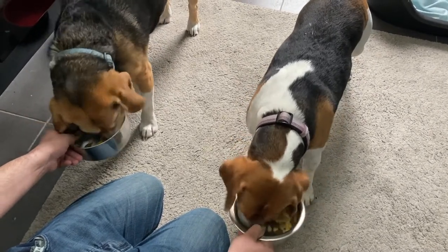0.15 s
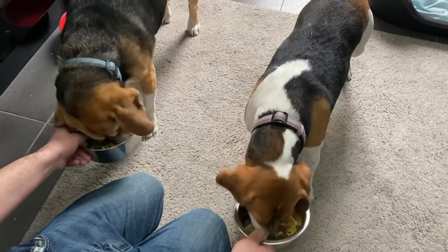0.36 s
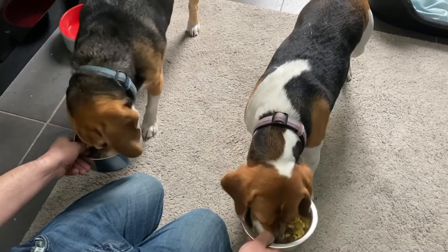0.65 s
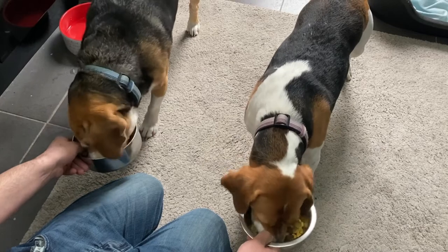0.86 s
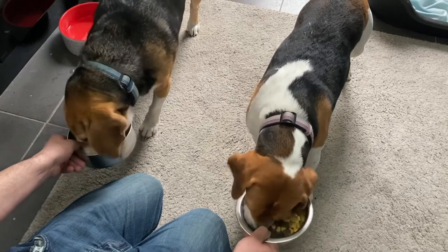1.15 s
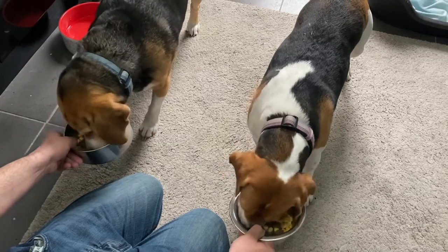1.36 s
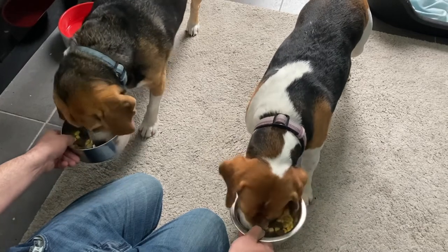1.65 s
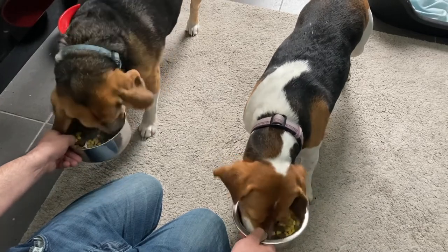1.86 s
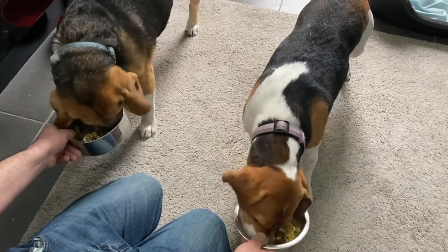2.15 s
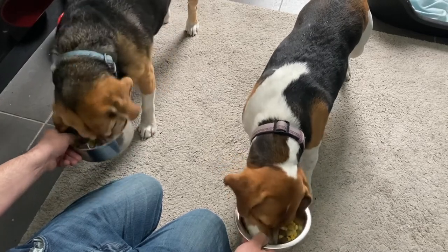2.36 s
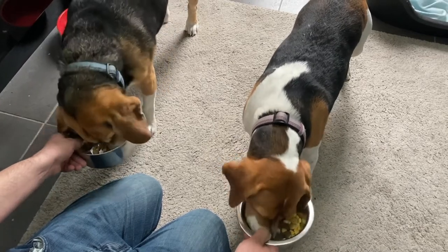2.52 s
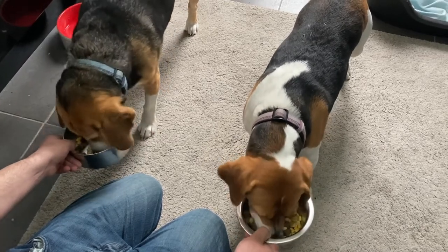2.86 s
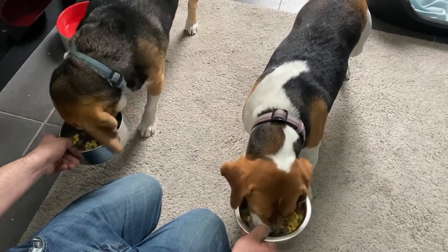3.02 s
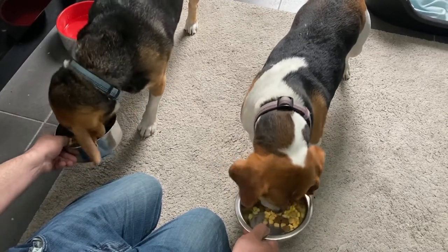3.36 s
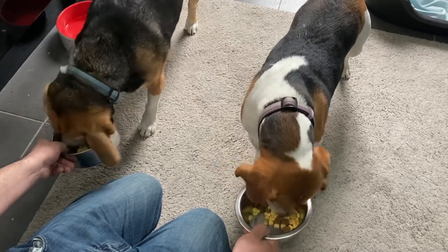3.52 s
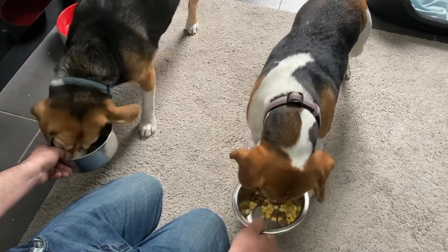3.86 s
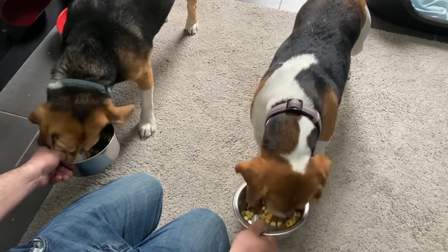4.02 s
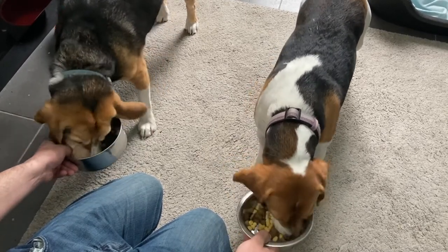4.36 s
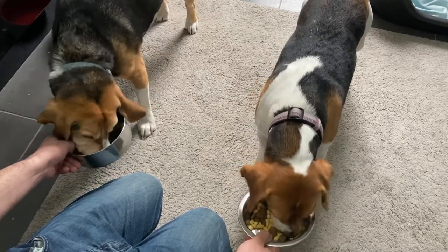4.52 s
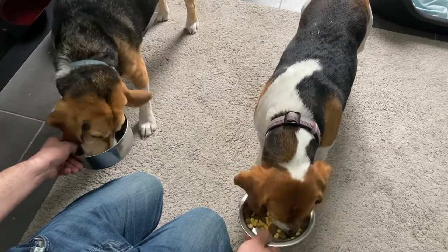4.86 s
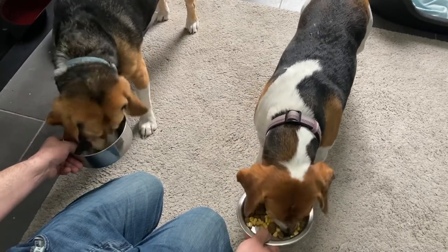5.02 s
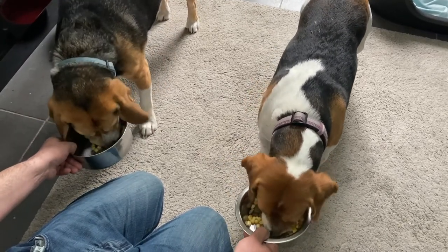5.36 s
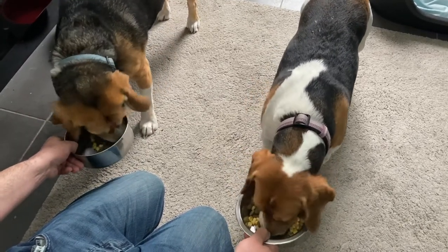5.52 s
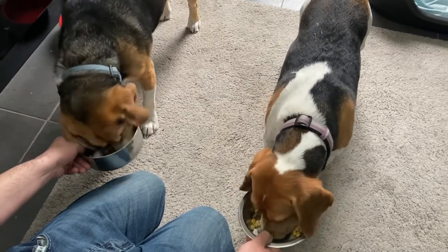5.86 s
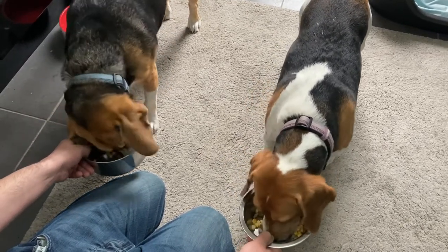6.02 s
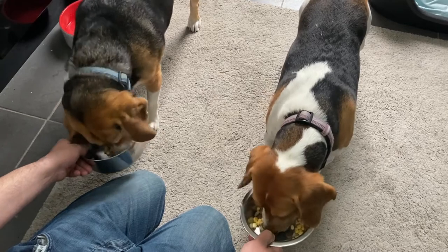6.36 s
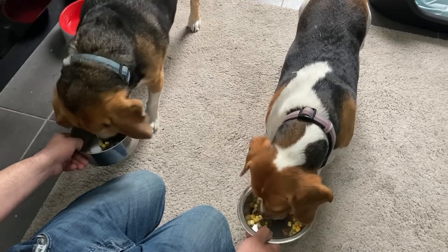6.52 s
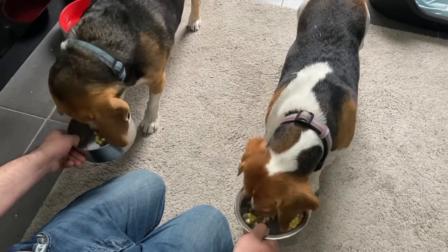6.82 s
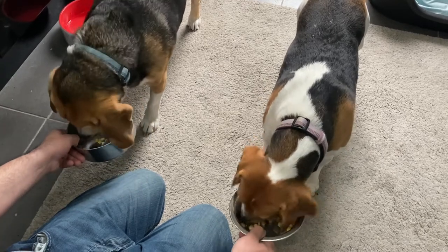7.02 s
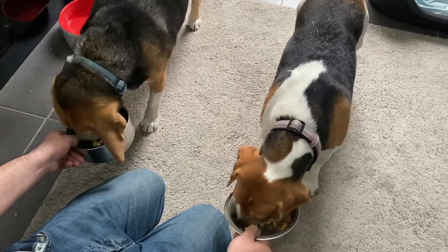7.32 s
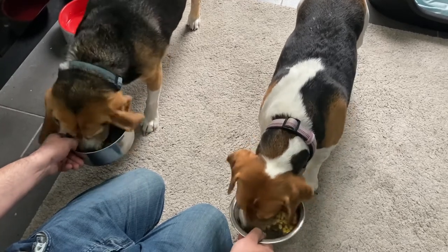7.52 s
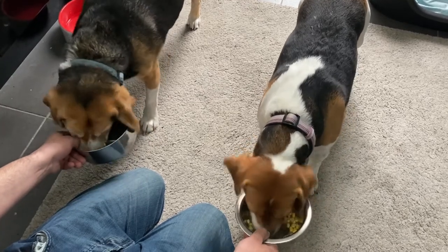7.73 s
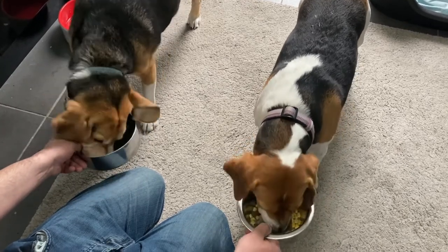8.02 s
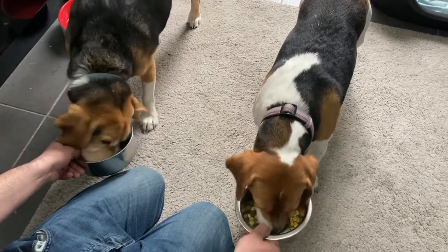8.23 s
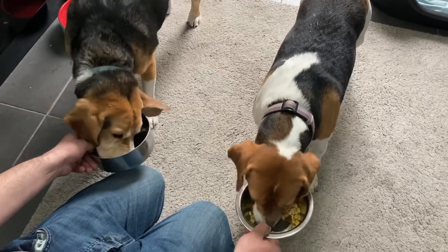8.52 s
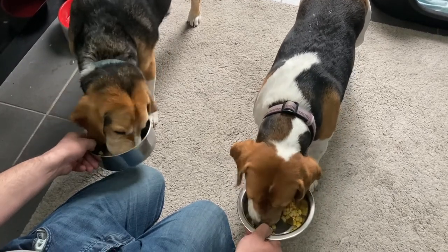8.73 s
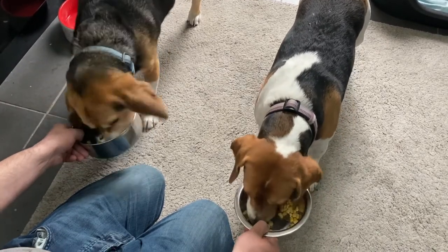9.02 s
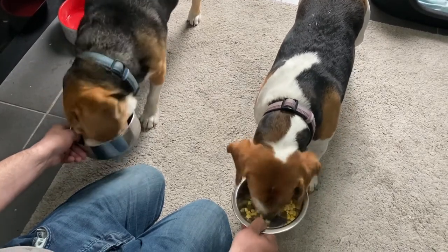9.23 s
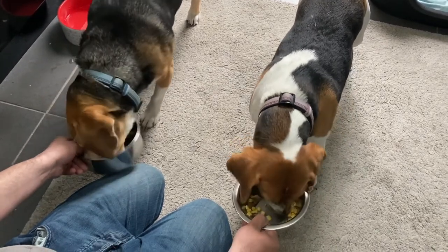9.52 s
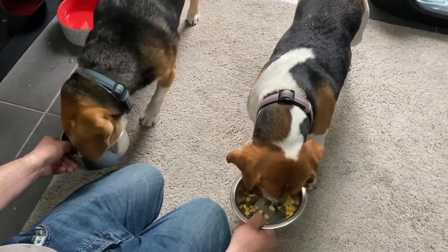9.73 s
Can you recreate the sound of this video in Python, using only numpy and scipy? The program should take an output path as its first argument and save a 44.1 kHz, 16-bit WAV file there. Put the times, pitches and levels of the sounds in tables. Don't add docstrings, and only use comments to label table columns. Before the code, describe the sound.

Close, busy dog eating indoors: grainy scraping and soft hollow laps in two metal bowls, hard kibble clinks and brief collar-tag jingles.

```python
import sys
import numpy as np
from scipy import signal
from scipy.fft import rfft, irfft, next_fast_len
from scipy.io import wavfile
from scipy.ndimage import uniform_filter1d, map_coordinates

SR = 44100
rng = np.random.default_rng(int(sys.argv[2]) if len(sys.argv) > 2 else 0)


def transcribe(signal):
    frames = np.atleast_2d(signal).T
    limited = np.clip(frames, -1, 1)
    pcm = np.round(limited * 32767).astype(np.int16)
    wavfile.write(sys.argv[1], SR, pcm)


def linear_from_db(decibels):
    return 10 ** (np.asarray(decibels, float) / 20)


N = 435708

# pitch_hz, width_hz, level_db
TAGS = [(5360, 330, 2), (5880, 63, 4.5), (5040, 78, -3.5), (7430, 100, 5), (8200, 73, 5.5), (9130, 140, 3),
        (9700, 1300, -14.5), (10960, 99, 5), (12300, 130, -22)]
# pitch_hz, width_hz, level_db
HOLLOW = [(453.5, 63, -10.5), (531, 56, -7.5), (662.5, 59, 1.5), (720.6, 43, 3.5), (813, 120, -6.5)]
# pitch_hz, width_hz, level_db
WALL = [(1030, 21, -2), (1420, 31, 5), (1650, 10.6, 0.5), (1983, 7, -3), (2660, 35, 0), (3730, 43, 4),
        (4390, 136, -28)]
# frequency_hz, likeness (0 to 1)
FLOOR_ALIKE = [(60, .88), (290, .85), (700, .65), (1500, .1)]
# start_s, peak_db, pitch_hz, drag_s (the tongue dragging on after)
LEFT_THUDS = [(0.134, -19.5, 733, 0.17), (0.445, -29, 680, 0.1), (0.771, -31.5, 660, 0.062),
              (0.833, -26.5, 600, 0.034), (1.051, -23, 686, 0.17), (1.747, -31.5, 675, 0.24),
              (2.089, -28, 730, 0.15), (2.287, -25, 686, 0.24), (2.426, -22, 567, 0.4),
              (2.759, -30.5, 675, 0.28), (2.918, -17.5, 695, 0.24), (2.961, -15, 740, 0.056),
              (3.337, -28.5, 693, 0.085), (3.517, -33, 635, 0.3), (3.943, -21.5, 582, 0.049),
              (4.146, -21, 720, 0.25), (4.357, -19, 760, 0.36), (4.435, -23.5, 755, 0.23),
              (4.694, -28, 660, 0.38), (4.857, -17.5, 700, 0.028), (5.103, -27, 770, 0.38),
              (5.231, -29, 710, 0.027), (5.527, -23.5, 710, 0.14), (5.824, -27, 700, 0.14),
              (6.31, -27.5, 600, 0.1), (6.542, -25.5, 670, 0.093), (7.058, -18.5, 722, 0.033),
              (9.176, -19.5, 606, 0.051), (9.513, -33.5, 714, 0.15)]
RIGHT_THUDS = [
    (1.552, -25.5, 815, 0.11),
    (4.921, -27.5, 636, 0.66),
    (5.728, -29, 686, 0.07),
    (5.968, -31.5, 540, 0.025),
    (7.476, -32.5, 638, .1),
    (8.61, -22, 594, 0.12),
    (8.879, -20, 623, 0.076),
    (9.102, -27.5, 580, 0.27),
]


def unit(x):
    return x / np.sqrt(np.mean(x ** 2) + 1e-20)


def along(points, hz):
    f, v = np.transpose(points)
    return np.interp(np.log(hz + 1), np.log(f + 1), v)


def wobble(rate):
    knots = rng.standard_normal(int(N * rate / SR) + 4)
    return map_coordinates(knots, [np.arange(N) * rate / SR])


def filtered(x, response):
    m = next_fast_len(x.shape[-1] + 8192)
    spectrum = rfft(x, m) * response(np.fft.rfftfreq(m, 1 / SR))
    return irfft(spectrum, m)[..., :x.shape[-1]]


def resonances(modes):
    return lambda f: sum((-1) ** k * linear_from_db(db) * 1j * f * w / (c * c - f * f + 1j * f * w)
                         for k, (c, w, db) in enumerate(modes))


def diffuse(f):
    turn = np.arccos(along(FLOOR_ALIKE, f)) / 2
    return np.array([np.cos(turn), np.sin(turn)])


def by_bowl(left, right):
    return [(bowl, *row) for bowl, rows in enumerate([left, right]) for row in rows]


def strike(bowls, s, bowl, sound):
    return bowls[bowl, round(s * SR):][:len(sound)]


def background():
    # frequency_hz, level_db (per Hz)
    air_colour = [(30, -17), (86, -17.5), (266, -5.5), (473, -9.5), (900, -13.5), (1430, -15.5),
                  (3500, -30), (7000, -41), (12000, -49), (16000, -49)]
    # pitch_hz, level_db (rms), phase_rad
    hums = [(98.76, -67.1, .4), (99.823, -69.9, 1.45), (200.99, -75, 0), (246.89, -72, 0), (296.26, -73, 0)]
    whistle = resonances([(2950, 70, 6)])
    air = linear_from_db(1.9 * np.sin(np.arange(N) / 8900.0)) * rng.standard_normal((2, N))
    mid, side = filtered(air, lambda f: linear_from_db(along(air_colour, f)) * abs(1 + whistle(f)) * diffuse(f))
    t = np.arange(N) / SR
    hum = sum(linear_from_db(db + 6.5) * np.cos(2 * np.pi * hz * t + phase) for hz, db, phase in hums)
    return linear_from_db(-56.5 + 0.13 * wobble(0.62)) * unit(np.array([mid + side, mid - side])) + hum


def grains(per_s, spread_db, hiss):
    hit = rng.random(N) < per_s / SR * linear_from_db(np.minimum(5 * wobble(40), 5))
    force = linear_from_db(spread_db * np.minimum(rng.standard_normal(N), 1.6))
    size = signal.lfilter([1], [1, -np.exp(-1 / (0.00047 * SR))], hit * force)
    return unit((unit(size) + hiss) * rng.standard_normal(N))


def pings(per_s, centre_hz, cycles):
    draw = rng.standard_normal((int(per_s * N / SR), 2))
    hz = np.clip(centre_hz * np.exp(0.537 * draw[:, :1]), 900, 14000)
    t = np.arange(256) / SR
    force = linear_from_db(5 * np.minimum(draw[:, 1:], 1.5))
    wave = force * np.exp(-t * hz / cycles) * np.sin(2 * np.pi * hz * t)
    at = rng.integers(N, size=(len(hz), 1)) + np.arange(len(t))
    return unit(np.bincount(at.ravel(), wave.ravel(), N)[:N])


def patchy(x, depth_db):
    z = signal.stft(x, nperseg=256)[2]
    field = uniform_filter1d(uniform_filter1d(rng.standard_normal(z.shape), 4, 0), 9, 1)
    return signal.istft(z * linear_from_db(depth_db * unit(field)), nperseg=256)[1][:N]


def stroke_gain(rows, swing_db):
    s, db, rise, fall = np.transpose(rows)[:, :, None]
    t = np.arange(0, N, 16) / SR
    gain = linear_from_db(db - swing_db * np.maximum((s - t) / rise, (t - s) / fall))
    return np.interp(np.arange(N) / SR, t, np.sqrt(np.sum(gain ** 2, axis=0)))


def efforts():
    # peak_s, scrape_db, rise_s, fall_s, dry_db (dry shuffle over scrape)
    tongue_sweeps = [(0.1, -30, 0.068, 0.39, -4.5), (0.349, -31, 0.18, 0.29, 1.5),
                     (0.559, -48, 0.53, 0.12, 15), (0.872, -40, 0.14, 0.14, 2), (1.018, -53.5, 0.019, 0.1, 13),
                     (1.14, -30, 0.11, 0.11, -11.5), (1.29, -44.5, 0.025, 0.83, 3.5),
                     (1.57, -33.5, 0.055, 0.12, 0.5), (1.8, -40, 0.11, 0.16, 1),
                     (2.16, -37.5, 0.055, 0.12, -9), (2.325, -49, 0.025, 0.19, 7.5),
                     (2.49, -34.5, 0.053, 0.24, 0), (2.704, -60, 0.061, 0.19, 16.5),
                     (2.764, -25.5, 0.019, 0.16, -18.5), (2.98, -36, 0.099, 0.079, -19),
                     (3.452, -40.5, 0.077, 0.3, -35), (3.59, -46.5, 0.17, 0.19, 5.5),
                     (3.822, -49.5, 0.037, 0.84, 10.5), (3.941, -35, 0.12, 0.56, -2.5),
                   (4.1, -37, 0.088, 0.94, 1.5), (4.36, -30.5, 0.016, 0.41, -8.5),
                   (4.583, -35.5, 0.029, 0.094, -1.5), (4.747, -49, 0.022, 0.046, 13.5),
                   (4.85, -35.5, 0.049, 0.22, 0), (5.103, -53.5, 0.033, 0.61, -6.5),
                   (5.4, -54.5, 0.071, 0.38, -1), (5.524, -27, 0.011, 0.062, -18.5),
                   (5.737, -34, 0.1, 0.05, -10), (5.987, -37, 0.32, 0.13, -9),
                   (6.146, -46.5, 0.014, 0.5, -2), (6.316, -50, 0.17, 0.096, 9.5),
                   (6.446, -28.5, 0.017, 0.077, -39), (6.725, -38.5, 0.054, 0.05, -24),
                     (6.863, -42, .03, 0.65, 2), (6.95, -32.5, 0.13, 0.62, -1.5), (7.256, -31, 0.21, 0.24, -4),
                  (7.493, -28, 0.075, 0.14, -4), (7.735, -33.5, 0.053, 0.094, -3.5),
                  (7.982, -54, 0.044, 0.3, 9.5), (8.042, -35.5, 0.18, 0.084, -12),
                  (8.221, -58, 0.049, 0.29, 14), (8.33, -40, 0.079, 0.04, -6),
                  (8.492, -44, 0.0084, 0.26, -7), (8.623, -39, 0.021, 0.12, -3.5),
                  (8.786, -62, 0.016, 0.16, 6), (9.047, -38.5, 0.011, 0.35, -14.5),
                  (9.19, -40.5, 0.19, 0.082, -1.5), (9.424, -68.5, 0.1, 0.08, 13),
                  (9.553, -45.5, 0.0094, 0.078, -2.5), (9.619, -50.5, 0.23, 0.021, -11),
                  (9.73, -70.5, 0.0077, 0.16, 13)]
    # peak_s, level_db, fall_s
    shoves = [(0.389, -35.5, 0.098), (0.646, -33, 0.079), (0.874, -37.5, 0.024), (1.337, -44, 0.29),
              (2.196, -38, 0.022), (4.15, -22.5, 0.068), (6.136, -38, 0.26), (6.728, -30.5, 0.038),
              (6.985, -34.5, 0.27), (7.273, -36, 0.2), (7.503, -37.5, 0.41), (8.349, -33.5, 0.0097)]
    shove_rise_s, thud_rise_s = 0.091, 0.017
    after_thud_db = -11.5
    swing_db, dry_swing_db = 31, 35.5
    rest_press_db, rest_scrape_db = -59.5, -62.5
    strokes = [(s + thud_rise_s / 2, db + after_thud_db, thud_rise_s, drag)
               for s, db, hz, drag in LEFT_THUDS + RIGHT_THUDS]
    strokes += [(s, db, shove_rise_s, fall) for s, db, fall in shoves]
    press = stroke_gain(strokes, swing_db)
    sweeps = tongue_sweeps
    scrape = stroke_gain([(s, db, rise, fall) for s, db, rise, fall, dry_db in sweeps], swing_db)
    shuffle = stroke_gain([(s, db + dry_db, rise, fall) for s, db, rise, fall, dry_db in sweeps], dry_swing_db)
    return press + linear_from_db(rest_press_db), scrape + linear_from_db(rest_scrape_db), shuffle


def pushing(boom_share_db, rasp_share_db):
    # frequency_hz, level_db (per Hz)
    rasp_colour = [(150, -76), (400, -7.5), (900, -5), (1650, -2), (3000, -9), (5000, -12.5), (8000, -47)]
    # frequency_hz, level_db (per Hz)
    rattle_colour = [(500, -59), (2000, -7), (3600, 2), (5000, -3), (7000, -3), (10500, 0.5), (13500, -7),
                     (15800, -14)]
    slide = patchy(grains(per_s=260, spread_db=1.5, hiss=0.9), depth_db=2.5)
    boom = unit(filtered(slide, resonances(HOLLOW)))
    food = patchy(grains(per_s=990, spread_db=3.5, hiss=0.05), depth_db=5.5)
    wall, tinkle = resonances(WALL), resonances(TAGS)
    rasp = food + 0.8 * pings(per_s=400, centre_hz=2024, cycles=8.8)
    rasp = unit(filtered(rasp, lambda f: linear_from_db(along(rasp_colour, f)) * (1 + 1.81 * wall(f))))
    rattle = food + 1.1 * pings(per_s=580, centre_hz=6404, cycles=12)
    rattle = unit(filtered(rattle, lambda f: linear_from_db(along(rattle_colour, f)) * (1 + tinkle(f))))
    press, scrape, shuffle = efforts()
    rough = scrape * rasp + shuffle * rattle
    boom_gain = linear_from_db(boom_share_db + 2.86 * wobble(30))
    rough_gain = linear_from_db(rasp_share_db + 0.55 * wobble(30))
    return boom_gain * press * boom + rough_gain * rough


def touches(left, right, rise_s, edge, tail):
    bowls, t = np.zeros((2, N + SR)), np.arange(SR // 20) / SR
    for bowl, s, db, hz in by_bowl(left, right):
        rise = rise_s * np.sqrt(1000 / hz)
        swell = (t / rise * np.exp(1 - t / rise)) ** 2
        ring = tail * (1 - np.exp(-t / rise)) ** 2 * linear_from_db(-60 * t / 0.069)
        click = edge * np.exp(-t * hz * 1.5) * np.sin(2 * np.pi * 1.8 * hz * t)
        touch = (swell + ring) * np.sin(2 * np.pi * hz * t) + click
        strike(bowls, max(s - rise, 0), bowl, touch)[:] += linear_from_db(db) * touch
    return bowls[:, :N]


def ticks():
    # peak_s, level_db, pitch_hz
    left_ticks = [(0.0298, -40, 4120), (0.4521, -24.5, 4200), (0.7329, -43.5, 4400), (0.8715, -31.5, 2460),
                  (0.9172, -28.5, 2280), (1.088, -26, 705), (1.1407, -39, 6800), (1.7937, -32.5, 7440),
                  (1.8895, -35.5, 4240), (2.3198, -33.5, 2770), (2.539, -30.5, 2100), (2.6115, -30, 3670),
                  (2.777, -32.5, 5100), (3.1463, -41, 3760), (3.5171, -32.5, 2100), (3.9184, -33, 2670),
                  (3.9322, -24, 1450), (4.1665, -22.5, 4170), (4.4285, -22.5, 4300), (4.837, -32, 5040),
                  (5.0097, -33, 3980), (5.038, -31.5, 3850), (6.3013, -33.5, 2450), (6.4457, -29, 2050),
                  (6.9021, -30, 4330), (6.9319, -40, 4470), (7.0581, -24.5, 2490), (7.2287, -32, 7200),
                  (7.3615, -34, 4390), (7.4921, -33.5, 7500), (7.5124, -32, 2610), (7.5262, -39, 3930),
                  (7.8904, -37.5, 5040), (7.9042, -32, 3400), (8.0994, -27, 1410), (8.3519, -31, 1540),
                  (8.6153, -30, 1950), (9.3714, -33.5, 1780)]
    right_ticks = [(0.1047, -35, 5950), (0.3265, -26, 7900), (0.328, -30, 1640), (0.451, -23, 7640),
                   (0.4805, -30, 1590), (0.734, -37.5, 1440), (0.8707, -23, 7900), (0.8722, -28, 5140),
                   (1.0113, -32, 6600), (1.453, -26.5, 4670), (1.581, -28, 7200), (2.8258, -27.5, 1653),
                   (2.9618, -22.5, 1340), (2.979, -25.5, 1470), (3.334, -36.5, 2740), (3.461, -25.5, 1470),
                   (3.92, -29, 4900), (4.076, -28, 1590), (4.0923, -27, 1620), (4.2456, -26, 5650),
                   (4.248, -31, 1690), (4.2761, -33, 4090), (4.3638, -12.5, 1630), (4.4773, -24.5, 1580),
                   (4.5759, -26, 1450), (4.5987, -25, 1586), (4.6171, -33, 7600), (4.7484, -36, 5640),
                   (4.8515, -19, 5400), (4.853, -30, 7960), (4.8562, -27, 1740), (5.826, -25.5, 1390),
                   (5.965, -34, 1530), (5.977, -35, 2000), (6.265, -37, 5040), (6.396, -39, 1300),
                   (6.7193, -37, 6200), (7.0425, -24.5, 1360), (7.254, -19, 7200), (7.265, -23.5, 1630),
                   (7.3469, -21.5, 5990), (7.501, -29, 1540), (7.6028, -33.5, 1604), (7.889, -42, 7750),
                   (8.1247, -35, 6000), (8.231, -30, 7450), (8.648, -35, 6500), (8.829, -46, 4050),
                   (9.8254, -44.5, 3600),
                   (7.9555, -40, 2970),
        (7.988, -44, 4500),
        (8.526, -39, 3440),
        (8.895, -31.5, 2200),
    ]
    return touches(left_ticks, right_ticks, rise_s=0.002054, edge=0.65, tail=0.2)


def knocks():
    # start_s, peak_db, pitch_hz, bright_db (bright part)
    left_knocks = [(0.1045, -20, 1540, -7), (0.3251, -32, 1650, -18), (0.3865, -13, 1750, -20),
                   (0.4515, -15, 1490, -13), (0.549, -23, 3380, -36), (0.9145, -37, 2480, 0),
                   (1.5509, -25, 1080, -28), (2.1505, -25, 2660, -18), (2.5859, -21.5, 1730, -21),
                   (2.7606, -30.5, 1040, -11), (2.9582, -19.5, 1150, -49), (3.4434, -29, 1470, -26),
                   (4.004, -16.5, 4440, -9), (4.1661, -11.5, 1870, -17), (4.3531, -10, 1070, -18.5),
                   (4.5365, -19.5, 3450, -31), (4.575, -18.5, 1560, -29), (5.007, -33, 4500, -2.5),
                   (5.038, -35, 3530, -34), (5.5204, -33, 1110, -18), (5.8232, -28, 1120, -16),
                   (6.1436, -24.5, 2720, -23), (6.3959, -48, 1170, 6), (6.9307, -34, 1670, -34),
                   (7.0569, -19.5, 1440, -44), (7.1067, -14, 1680, -15), (7.3442, -18, 1420, -6.5),
                   (8.6113, -24, 1900, -19.5), (8.8775, -27.5, 2240, -36.5), (8.328, -29.5, 990, -60)]
    right_knocks = [(0.064, -33, 1650, 1), (0.227, -19.5, 1670, -15.5), (0.5713, -18.5, 1870, -23),
                    (0.831, -22.5, 1940, -14), (1.342, -22, 1730, -5), (2.776, -16, 1040, -18.5),
                    (0.361, -20, 3050, -25), (1.8878, -37.5, 3380, -36), (2.9173, -20, 1070, -42),
                    (3.455, -25, 1830, -49), (4.365, -11.5, 1610, -8.5), (4.4268, -11.5, 4390, -12),
                    (4.9227, -22.5, 1030, -13.5), (6.4376, -22, 1560, -10), (6.9521, -18, 1630, -8),
                    (7.204, -22.5, 1400, -2), (7.644, -26.5, 4390, -12.5), (9.3732, -42, 1840, -24)]
    bowls, t = np.zeros((2, N + SR)), np.arange(SR // 5) / SR
    bright = signal.butter(2, [4500, 12500], "bandpass", fs=SR, output="sos")
    snap = signal.butter(2, [800, 5000], "bandpass", fs=SR, output="sos")
    for bowl, s, db, hz, bright_db in by_bowl(left_knocks, right_knocks):
        strengths, pitches = rng.normal(0, 4, len(WALL)), rng.normal(1, .03, len(WALL))
        ring = sum(linear_from_db(level + g) * np.exp(-np.pi * 1.4 * width * t) * np.sin(2 * np.pi * c * p * t)
                   for (c, width, level), g, p in zip(WALL, strengths, pitches))
        noise = rng.standard_normal((3, len(t)))
        scatter = (linear_from_db(-60 * t / 0.012) + 0.15 * linear_from_db(-60 * t / 0.12)) * noise[:2]
        near_note = signal.butter(2, [hz * 0.78, hz * 1.21], "bandpass", fs=SR, output="sos")
        note = signal.sosfilt(near_note, scatter[0] + 0.25 * linear_from_db(-60 * t / 0.22) * noise[2])
        crack = signal.sosfilt(snap, linear_from_db(-60 * t / 0.0033) * noise[2])
        spray = signal.sosfilt(bright, scatter[1])
        knock = linear_from_db(-20.0) * ring + linear_from_db(5.0) * note
        knock += linear_from_db(9.5 + 0.42 * bright_db) * crack + linear_from_db(bright_db + 2.5) * spray
        strike(bowls, s, bowl, knock)[:] += linear_from_db(db) * knock
    return signal.sosfilt(signal.butter(2, 450, "highpass", fs=SR, output="sos"), bowls[:, :N])


def laps():
    # peak_s, level_db, pitch_hz
    left_laps = [(0.4477, -40, 715), (0.7786, -33, 660), (2.3075, -23, 673), (2.6398, -24, 690),
                 (2.777, -18.5, 661), (2.7791, -24, 1100), (2.9867, -25, 646), (3.5222, -31, 710),
                 (3.93, -25, 760), (4.4379, -19.5, 694), (4.9843, -27, 715), (5.514, -31, 690),
                 (6.979, -32, 680), (9.1784, -25.5, 584)]
    right_laps = [(0.1081, -27, 1030), (0.222, -29, 637), (0.3897, -27.5, 737), (0.6117, -27.5, 680),
                  (0.6356, -27.5, 676), (0.6596, -27, 673), (0.8802, -32.5, 700), (1.5282, -35, 880),
                  (1.5782, -30.5, 770), (2.1631, -25, 680), (2.3423, -28.5, 697), (2.7624, -23, 1030),
                  (2.7937, -31, 1030), (2.8031, -28, 716), (3.8059, -38, 704), (4.0795, -28.5, 1030),
                  (4.1143, -20, 720), (4.1905, -31, 830), (4.3552, -25.5, 1100), (4.747, -36, 780),
                  (4.8755, -23, 707), (5.1447, -31, 730), (5.1766, -32, 705), (5.8268, -30, 400),
                  (5.8282, -29, 1090), (6.2048, -29.5, 674), (6.3985, -39, 420), (6.4472, -30, 713),
                  (6.5618, -33, 760), (6.6982, -32, 643), (6.7258, -43, 716), (6.7396, -32, 683),
                  (6.9936, -26, 696), (7.077, -32, 780), (7.2105, -27, 1350), (7.27, -27, 692),
                  (7.2838, -28.5, 704), (7.4964, -31.5, 683), (7.5254, -27, 1090), (7.5421, -28, 1030),
                  (8.3367, -26, 975), (8.626, -32, 1120),
                  (.695, -38, 1010),
        (2.995, -25.5, 1020),
        (8.598, -29.5, 608),
        (8.867, -32.5, 677),
    ]
    return touches(left_laps, right_laps, rise_s=0.00411, edge=0.02, tail=0.071)


def thuds():
    bowls, t = np.zeros((2, N + SR)), np.arange(SR // 5) / SR
    for bowl, s, db, hz, drag in by_bowl(LEFT_THUDS, RIGHT_THUDS):
        swell = 1.63 * (t / 0.0021 * np.exp(1 - t / 0.0019)) ** 2 * np.sin(2 * np.pi * hz * t)
        hum = sum(linear_from_db(level + 1.6 * rng.normal()) * np.exp(-np.pi * .8 * width * t)
                  * np.sin(2 * np.pi * c * hz / 690 * rng.normal(1, 0.022) * t) for c, width, level in HOLLOW)
        thud = linear_from_db(db + 1.5) * (swell + 0.076 * hum * (1 - np.exp(-t / 0.0035)) ** 2)
        strike(bowls, s, bowl, thud)[:] += thud
    return bowls[:, :N]


def bumps():
    # start_s, peak_db, pitch_hz
    pushes = [
        (2.351, -43, 155),
        (2.438, -36, 156),
        (5.537, -40.5, 275),
        (5.822, -37, 371),
        (6.305, -39, 253),
        (6.356, -30.5, 246),
        (6.397, -32.5, 275),
        (6.651, -35, 174),
        (8.312, -45.5, 316),
        (9.06, -42, 300),
    ]
    out, t = np.zeros(N + SR), np.arange(SR // 5) / SR
    for s, db, hz in pushes:
        glide = t + 0.00053 * (1 - np.exp(-t / 0.0013))
        body = linear_from_db(-60 * t / 0.12) * np.sin(2 * np.pi * hz * glide)
        body += 0.56 * linear_from_db(-60 * t / 0.04) * np.sin(2 * np.pi * 1.85 * hz * t)
        rub = filtered(linear_from_db(-60 * t / 0.2) * rng.standard_normal(len(t)), resonances([(hz, 1.3 * hz, 7)]))
        out[round(s * SR):][:len(t)] += linear_from_db(db + 2.0) * (body + rub)
    return out[:N]


def tags():
    # start_s, peak_db
    jingles = [(3.111, -41.5), (3.193, -39.5), (3.318, -40.5), (4.819, -35), (4.856, -26), (2.7, -29),
               (6.271, -24), (6.304, -13), (9.046, -43), (6.434, -31), (7.245, -18), (8.213, -44)]
    out, t = np.zeros(N + SR), np.arange(SR // 3) / SR
    for s, db in jingles:
        decay = linear_from_db(-60 * t / 0.0029) + 0.43 * linear_from_db(-60 * t / 0.18)
        chatter = decay * (1 - np.exp(-t / 0.0018)) * rng.standard_normal(len(t))
        discs = resonances([(hz, width, level + rng.normal(0, 5.5)) for hz, width, level in TAGS])
        jingle = filtered(chatter, lambda f: discs(f) + 0.27 * (abs(f - 8500) < 4500))
        out[round(s * SR):][:len(t)] += linear_from_db(db + 3.5) * jingle
    return out[:N]


def room(x):
    # frequency_hz, t60_s
    decay_times = [(200, 0.13), (1000, 0.13), (4000, 0.057), (12000, 0.032)]
    hz, t, z = signal.stft(rng.standard_normal((2, SR // 2)), SR, nperseg=256)
    tail = signal.istft(z * linear_from_db(-60 * t / along(decay_times, hz)[:, None]), SR, nperseg=256)[1]
    mid, side = filtered(tail / np.linalg.norm(tail[0]), diffuse)
    late = np.pad(x, (130, 0))[None]
    return signal.fftconvolve(late, [mid + side, mid - side], axes=1)[:, :N]


def placed(x, lag, pan_db):
    step = linear_from_db([[pan_db / 2], [-pan_db / 2]])
    return filtered(x, lambda f: step * np.exp([[1j], [-1j]] * (np.pi * f * lag)))


def scene():
    lags = [0.000448, -0.000053]
    left, right = knocks() + thuds() + laps() + ticks()
    left = left + pushing(boom_share_db=-6, rasp_share_db=-3.5) + tags()
    right = right + pushing(boom_share_db=-1.5, rasp_share_db=-5.5) + bumps()
    direct = placed(left, lags[0], pan_db=4.5) + placed(right, lags[1], pan_db=-3.5)
    return direct + linear_from_db(-8) * room(left + right) + background()


def thinned(x, share_db, mask_db, faint_db):
    hz, _, z = signal.stft([x[0] + x[1], x[0] - x[1]], SR, nperseg=1024)
    power = np.add.reduceat(abs(z) ** 2, np.arange(0, len(hz), 16), axis=1)
    top = (hz[::16] > 13000)[:, None]
    drowned = linear_from_db(2 * share_db) * power.sum(0) + linear_from_db(2 * mask_db) * power.sum((0, 1)) * top + linear_from_db(2 * faint_db)
    bar = drowned * linear_from_db(8.0 * uniform_filter1d(rng.standard_normal(power.shape), size=6, axis=2))
    treble = power[:, 8:].sum((0, 1))
    bar *= linear_from_db(-25 * (treble > 2.5 * np.roll(treble, 2)))
    keep = np.repeat(power > bar, 16, axis=1)[:, :len(hz)] | (hz < 5600)[:, None]
    total, apart = signal.istft(z * keep, SR, nperseg=1024)[1][:, :N]
    return np.array([total + apart, total - apart]) / 2


def low_pass(x):
    return signal.sosfilt(signal.butter(12, 16990, fs=SR, output="sos"), x)


def record(dry):
    split = lambda f: 1 / (1 + (f / 5900) ** 16)
    turn = lambda f: np.pi * (f - 6900) / 4510
    x = filtered(dry, split)
    x = x + filtered(linear_from_db(0.5) * dry[0], lambda f: (1 - split(f)) * np.exp([[-1j], [1j]] * turn(f)))
    x = x + filtered(0.12 * dry[1], lambda f: 1 - split(f))
    x = filtered(x, lambda f: (f < 15800) / (1 + (80 / (f + 1)) ** 2))
    mix = thinned(x, share_db=-6.5, mask_db=-37.5, faint_db=-87)
    return low_pass(mix)


dry = scene()
out = record(dry)
transcribe(out)
```